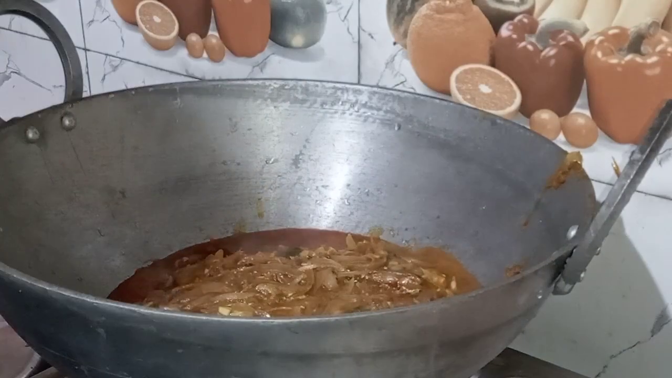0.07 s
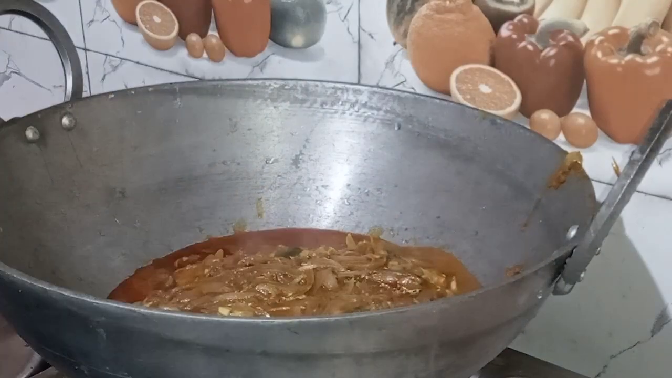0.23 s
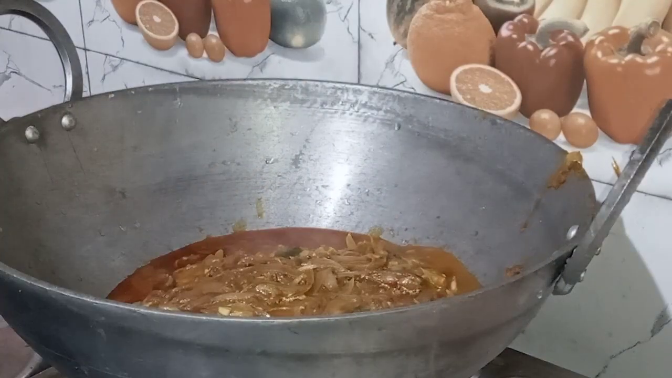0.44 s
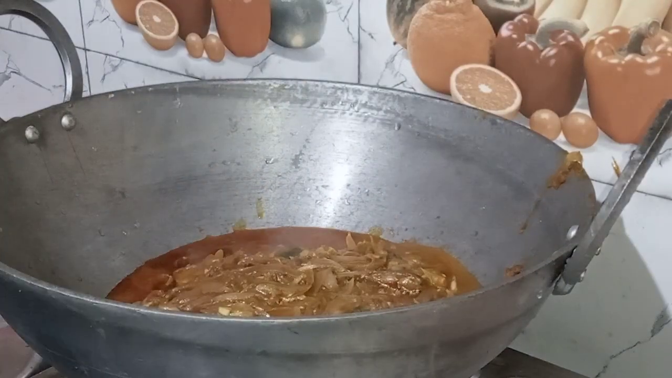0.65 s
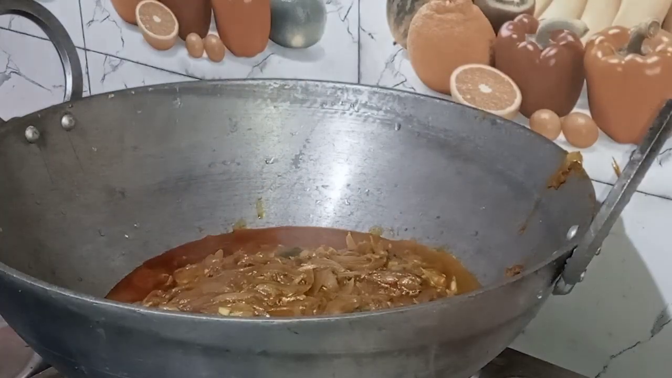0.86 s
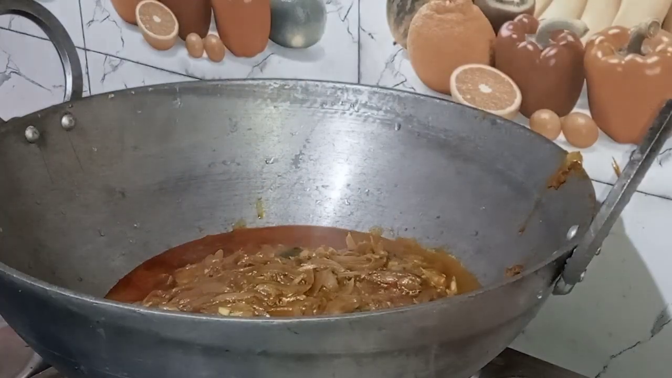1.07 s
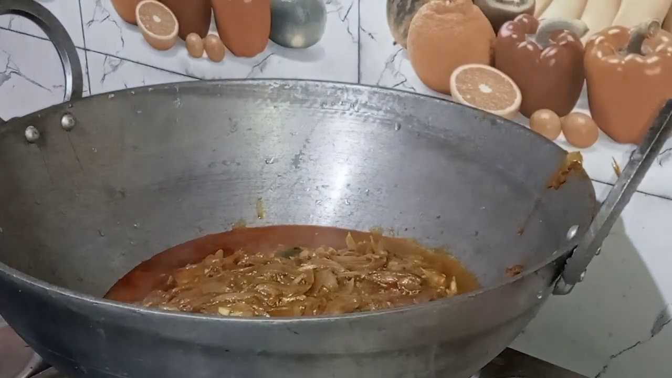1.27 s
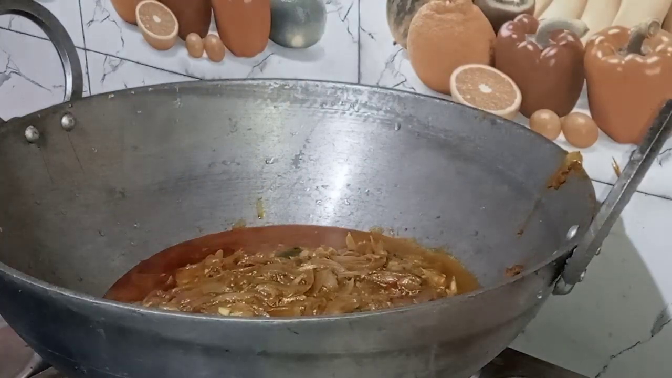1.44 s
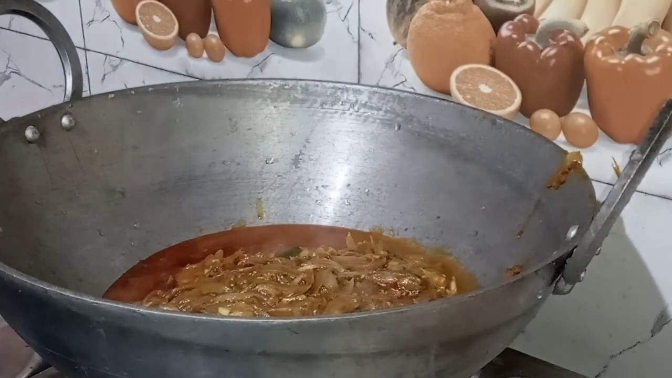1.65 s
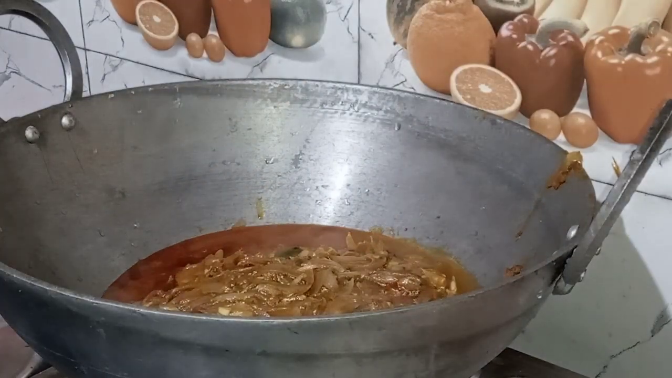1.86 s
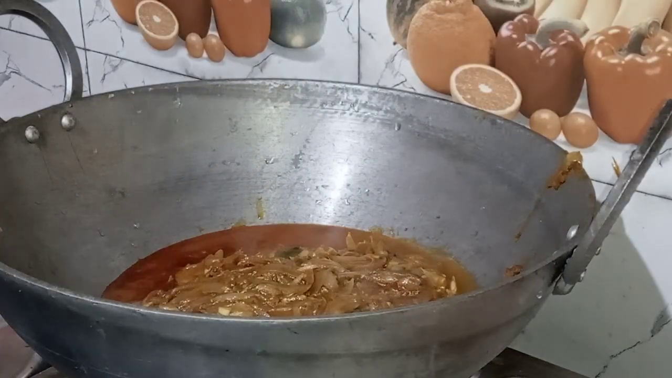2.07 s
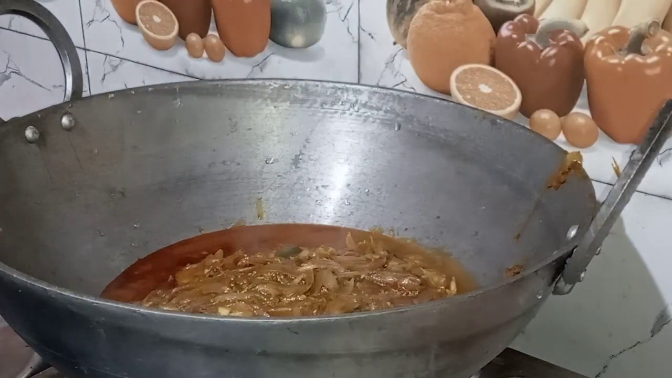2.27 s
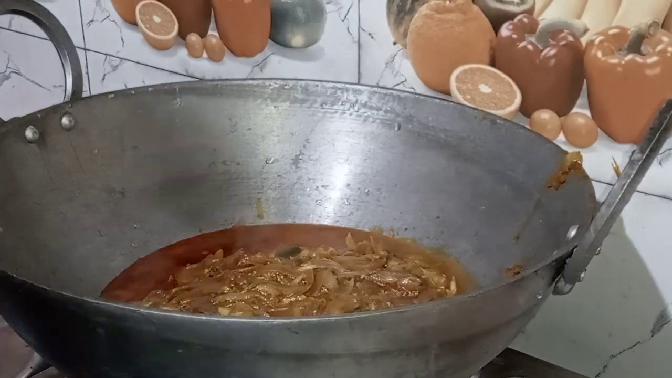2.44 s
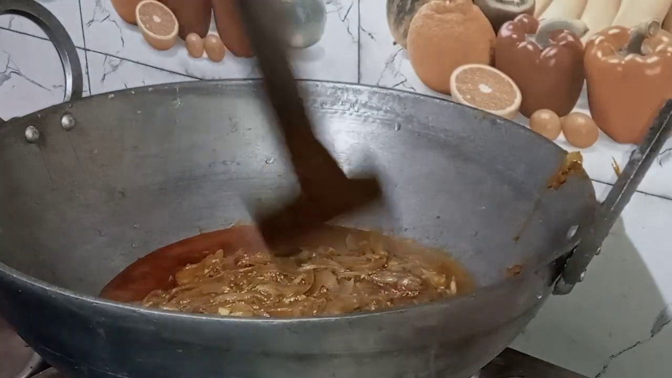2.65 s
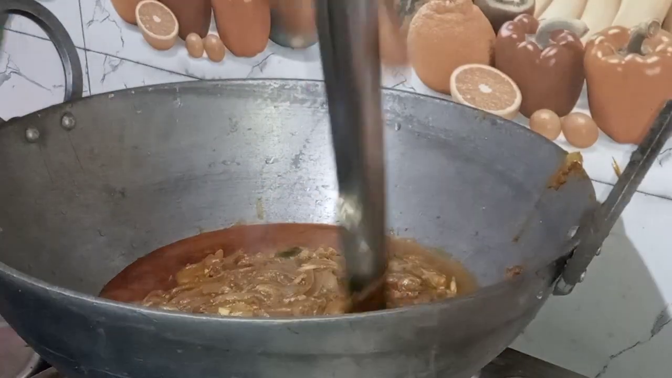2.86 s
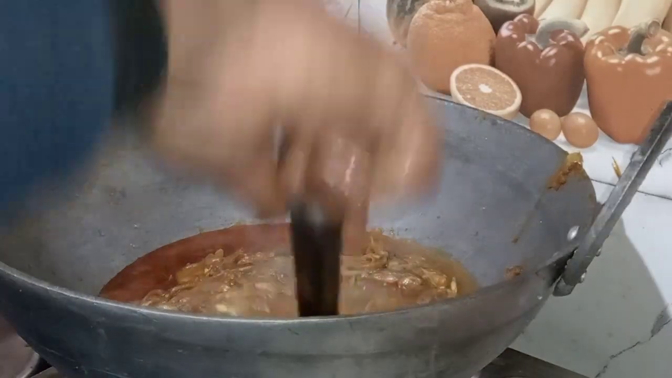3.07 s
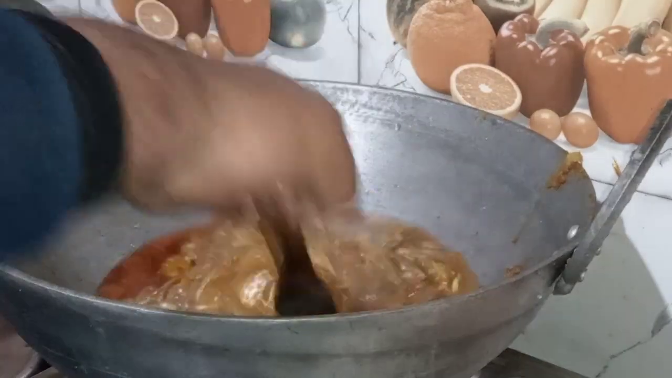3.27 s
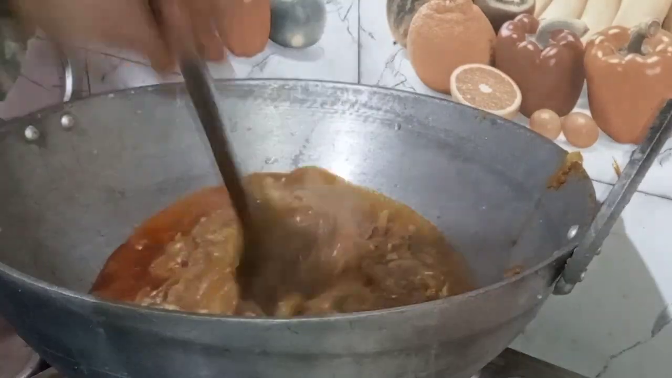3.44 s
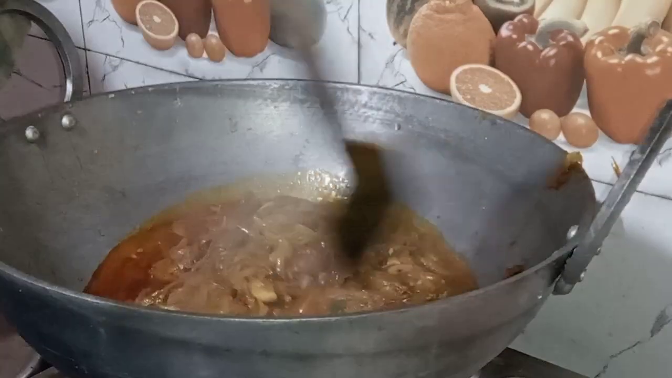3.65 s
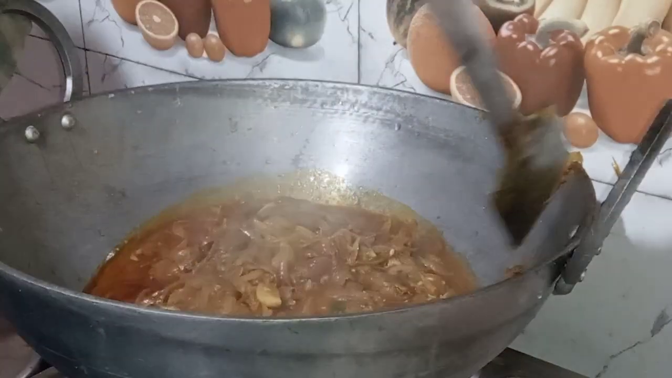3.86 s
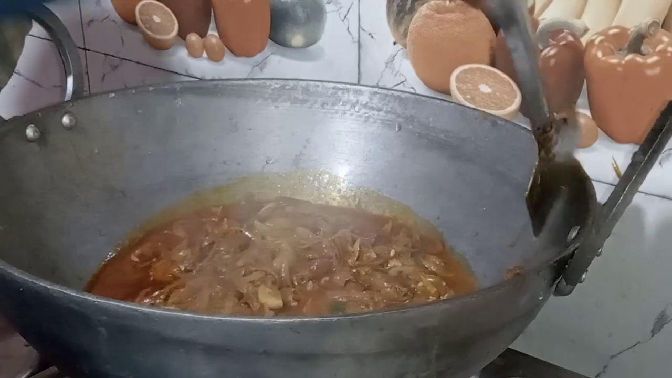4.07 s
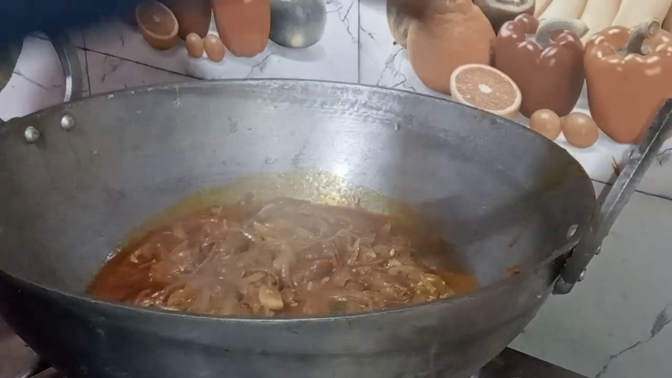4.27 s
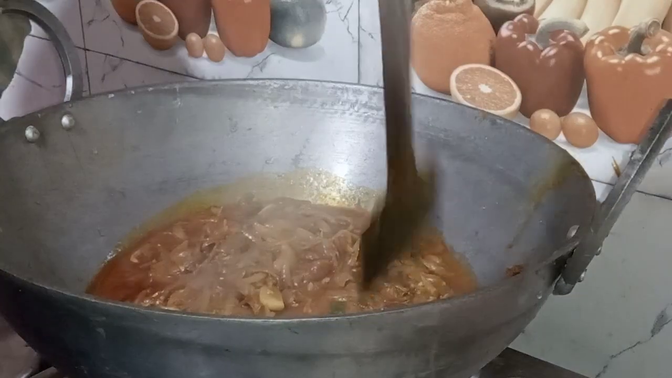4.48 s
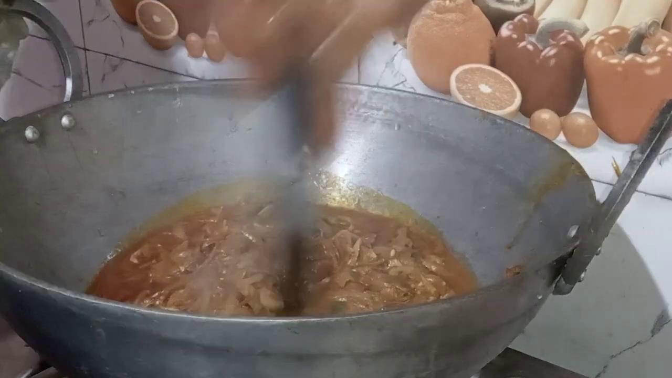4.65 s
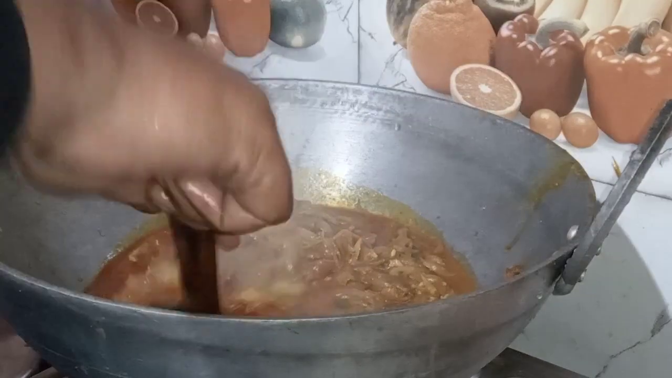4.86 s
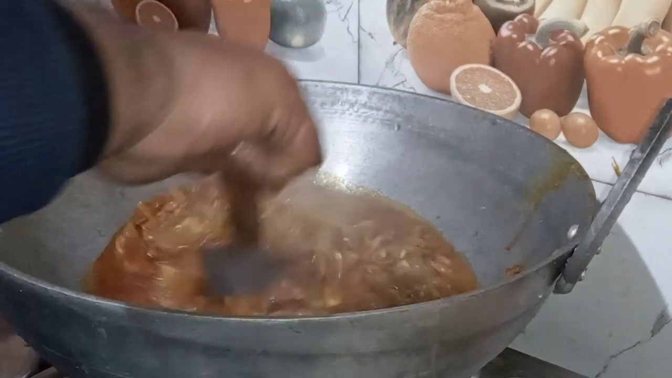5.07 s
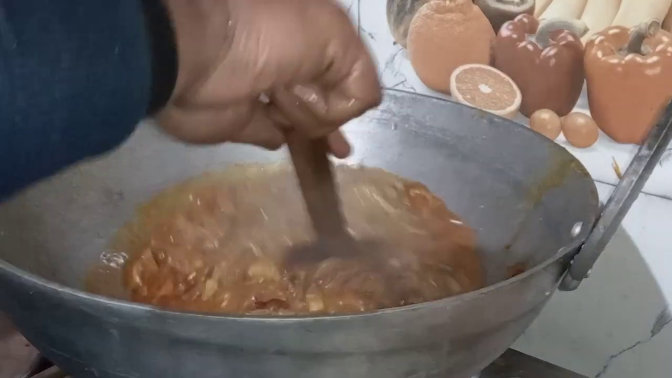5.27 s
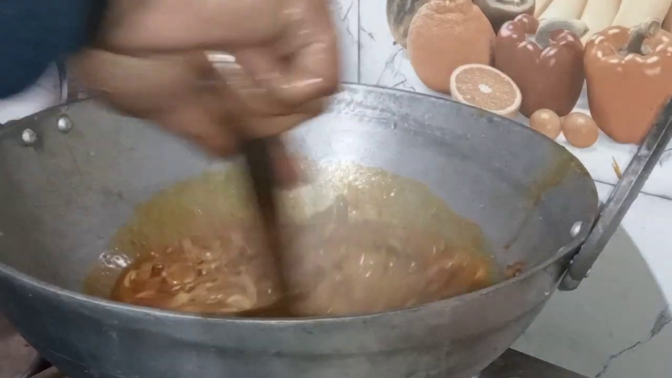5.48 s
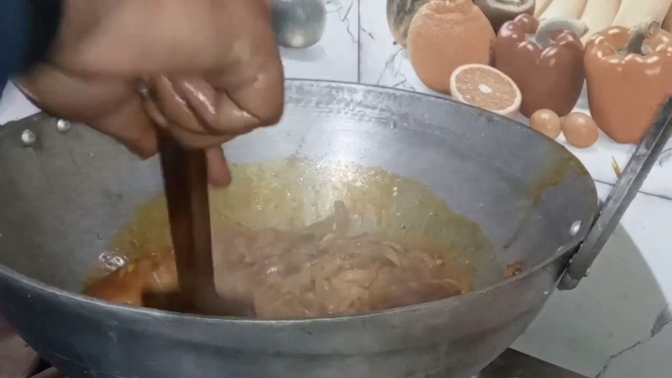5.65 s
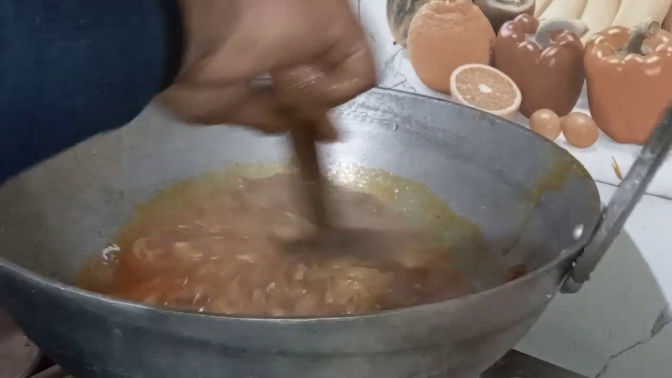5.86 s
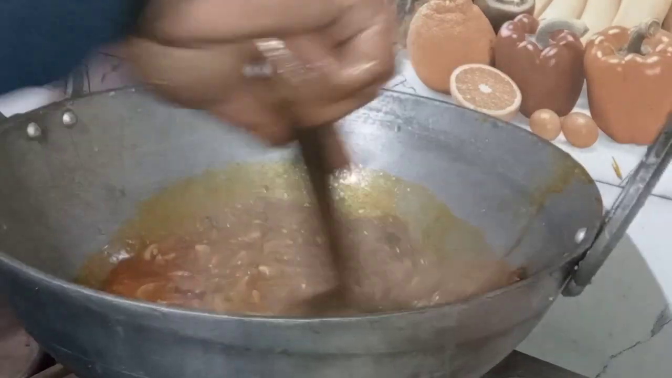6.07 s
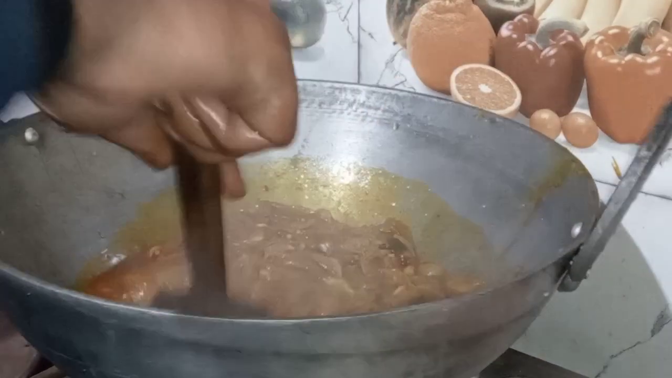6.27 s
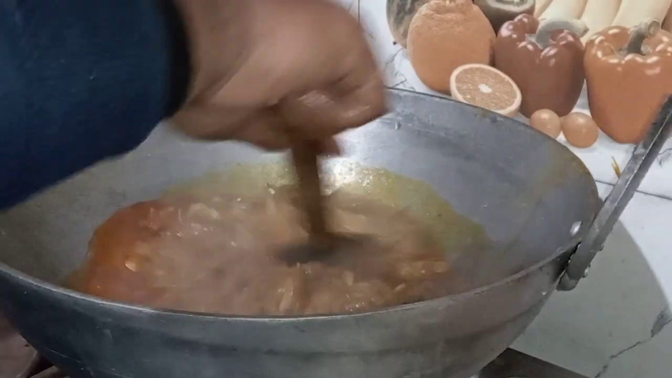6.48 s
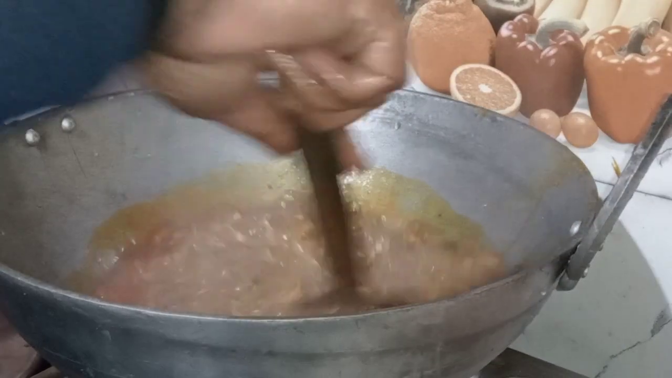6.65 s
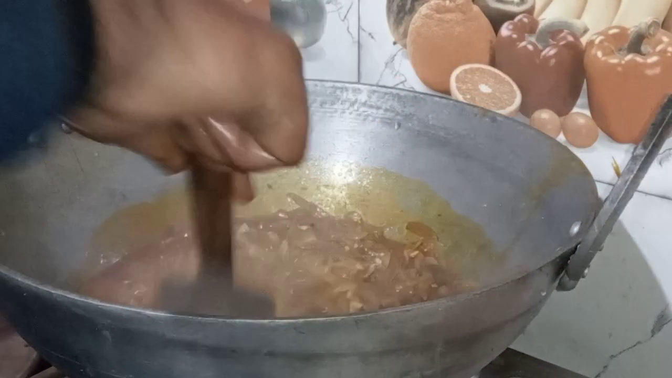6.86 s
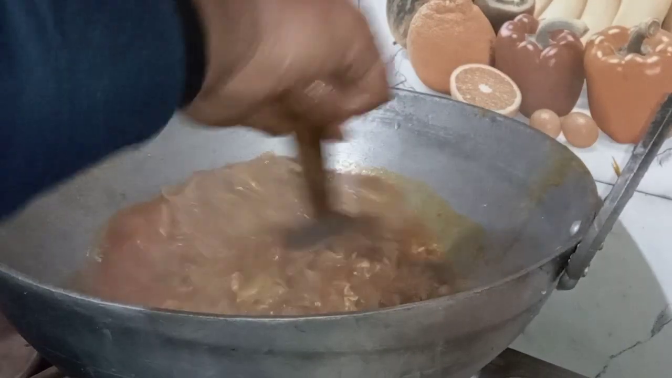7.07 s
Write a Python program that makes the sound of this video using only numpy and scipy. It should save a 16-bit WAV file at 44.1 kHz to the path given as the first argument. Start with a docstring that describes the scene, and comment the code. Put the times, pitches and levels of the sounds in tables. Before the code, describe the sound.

A quiet kitchen opens with a faint low rumble, a simmering murmur and soft cloth rustle. At about 1.4 seconds a metal pan is set down hard, bouncing briefly and ringing. At 2.2 seconds a ladle clinks brightly off a dish. At 2.9 seconds the steel ladle clanks into an iron pot and scrapes through thick curry until about 3.6 seconds. A quick ringing clatter of ladle on rim comes between 4.0 and 4.2 seconds. After another knock at 4.7 seconds, the stirring continues to the end at about 7 seconds: repeated gritty scrapes of steel on iron, mostly dropping in pitch, mixed with light, damped taps. The curry sloshes and gurgles softly after each stroke. Everything is close to one small microphone, with slightly dulled highs and a little ring from hard walls.

```python
"""A steel ladle knocks and scrapes round an iron pot of thick curry, close by in a quiet kitchen.
Both ring when they meet; the curry damps them and sloshes after each stroke. Before that, a pan is set
down hard and the ladle clinks off a dish. Behind it all: cloth rustle, a low rumble, a simmering murmur
and a little ring from hard walls. One small microphone, with no top octave, feeds a noise suppressor."""
import sys
import numpy as np
from scipy import signal
from scipy.io import wavfile
from scipy.ndimage import uniform_filter1d

SR = 44100
rng = np.random.default_rng(int(sys.argv[2]) if len(sys.argv) > 2 else 0)


def wav_record(signal):
    """Record a signal, one row per channel, as 16-bit PCM in the file named by sys.argv[1]."""
    frames = np.transpose(np.atleast_2d(signal))
    bounded = np.clip(frames, -1, 1)
    # unit amplitude maps onto the largest positive 16-bit level
    quanta = np.round(bounded * 32767).astype(np.int16)
    wavfile.write(sys.argv[1], SR, quanta)


N = 313992

# Clear modes of each object: (frequency [Hz], level [dB], t60 [s])
POT_MODES = [(461, -8.5, 0.15), (959, -17, 0.35), (1443, -12, 0.22), (1896, -6, 0.26), (2350, -4, 0.3),
             (2894, -2.5, 0.25), (3820, -5.5, 0.047), (4120, -12.5, 0.13), (4700, -14.5, 0.74),
             (5900, -10.5, 0.73), (7079, -2.5, 0.11)]
LADLE_MODES = [(1055, -11, 0.2), (1298, -10, 0.25), (3090, -10.5, 0.5), (3650, -2, 0.15), (4145, -3, 0.3),
               (5017, -5, 0.11), (5313, -6, 0.3), (6170, -10, 0.2)]
PAN_MODES = [(119, -13.5, 0.7), (264, -12.5, 1), (423, -6, 0.5), (549, -3, 0.7), (628, 5, 0.12),
             (660, -4, 0.8), (779, -6.5, 0.98), (952, -9, 0.4), (3144, -17, 0.5), (3553, -7.5, 0.65),
             (4124, -11, 0.55), (4926, -21, 0.45), (5426, -17.5, 0.27), (6487, -15, 0.35), (7424, -27, 0.3)]
DISH_MODES = [(2033, 1, 0.72), (2248, 7.5, 0.39), (2780, -13.5, 0.25), (4300, -3, 0.19), (4780, -8, 0.45),
              (5770, -6.5, 0.29), (6420, -9.5, 0.34)]
FAINT_VESSEL_MODES = [(678, -53, 0.96), (320, -49.5, 0.28), (1430, -60.5, 0.56)]
# The crowd of weak modes between the clear ones: (frequency [Hz], level [dB per Hz])
POT_CROWD_TONE = [(60, -49), (170, -14), (1200, -3), (2500, 0.5), (5000, 5), (7500, -3)]
PAN_CROWD_TONE = [(60, -32), (150, -8), (680, 4), (1500, -23), (3500, -18.5), (8000, -45.5)]
DISH_CROWD_TONE = [(60, -43), (170, -15), (1000, -11), (2300, -5.5), (7000, -18)]
# Base ring time of the crowds and the walls: (frequency [Hz], t60 [s])
RING_TIMES = [(100, 0.94), (600, 1), (2000, 0.68), (8000, 0.52)]
# Ladle on pot: (time [s], level [dB], hardness [dB per octave], ladle over pot [dB], share of free t60)
LADLE_KNOCKS = [(2.8672, -20, 0.5, 20, 0.37), (2.8734, -15.5, 5.5, 1, 0.8), (3.4929, -39.5, -3.5, 8, 0.37),
                (4.0506, -15, -1, 8, 0.8), (4.0775, -21, -1.5, 6.5, 0.99), (4.154, -24, -0.5, -1.5, 0.47),
                (4.1775, -18, -0.5, -23.5, 0.47), (4.191, -23.5, -1, -23.5, 0.94), (4.206, -33, -3, -21, 1),
                (4.6741, -22.5, 0.5, 16, 0.22), (5.5417, -45, 9, -3.5, 0.57), (5.659, -40, -5, -10, 0.36),
                (5.9147, -45, -1, -10.5, 0.22), (5.981, -46, -7, -13, 0.24), (6.2713, -35, 0.5, -22, 0.42),
                (6.5189, -34.5, -2.5, -14, 0.29), (6.7998, -33.5, 9, -10, 0.13)]
# Ladle dragged over iron: (start [s], length [s], landing time [s], first pressure [dB],
# last pressure [dB], grit above 3.5 kHz [dB], first pitch of the free iron [Hz], last pitch [Hz])
LADLE_STROKES = [(2.992, 0.26, 0.084, -43, -43.5, -3, 2220, 730),
                 (3.299, 0.29, 0.18, -48, -61.5, -5, 660, 510),
                 (4.71, 0.25, 0.027, -43.5, -43, -5, 2160, 796),
                 (5.039, 0.18, 0.28, -47.5, -45, -11, 642, 1194),
                 (5.286, 0.014, 0.035, -52.5, -49, 0, 1490, 1680),
                 (5.554, 0.045, 0.0089, -59, -57, 4, 1470, 1330),
                 (5.669, 0.095, 0.033, -47.5, -38.5, -10.5, 1530, 1350),
                 (5.781, 0.27, 0.019, -46, -68.5, -6.5, 900, 685),
                 (6.275, 0.19, 0.019, -39.5, -44.5, -9, 2150, 852),
                 (6.542, 0.013, 0.01, -43, -57, 4.5, 1490, 1510),
                 (6.875, 0.19, 0.045, -43.5, -36, -4, 1570, 1240)]
# Hits and bounces: (time [s], level [dB])
PAN_HITS = [(1.3572, -22), (1.3615, -12.5), (1.409, -26.5), (1.464, -35)]
DISH_HITS = [(2.1854, -14), (2.2294, -33), (2.3444, -39.5)]
# Cloth and hands moving: (time [s], level [dB], fade [s])
CLOTH_MOVES = [(0.531, -60.5, 0.21), (0.842, -57, 0.13), (2.37, -57.5, 0.17), (3.831, -52, 0.063)]
# Room tone: (time [s], rumble [dB], simmer [dB], hiss [dB])
ROOM_LEVELS = [(0, -70.5, -64.5, -65.5), (0.698, -65, -64, -69), (1.101, -58, -61.5, -68),
               (2.3, -62, -57, -64), (3.699, -61, -62.5, -62), (3.876, -63, -58.5, -60),
               (4.599, -68.5, -61.5, -68), (5.45, -74, -58.5, -68), (6.128, -60.5, -55.5, -67),
               (6.75, -58, -60.5, -72.5)]
# Edges of the rumble, simmer and hiss bands: (frequency [Hz])
ROOM_EDGES_HZ = [0, 200, 900, SR]
# Spectra of the noisy sources: (frequency [Hz], level [dB per Hz])
SCRAPE_TONE = [(120, -21), (260, -7), (600, -9), (1250, -9), (2100, -13), (2900, -9), (3900, -11),
               (6500, -14.5)]
SLOSH_TONE = [(150, -9.5), (270, -0.5), (550, -5), (900, 2.5), (1500, -28)]
CLOTH_TONE = [(450, -15), (1500, -9.5), (2500, -8.5), (6000, -10)]
ROOM_TONE = [(20, -38.5), (60, -14), (120, -0.5), (195, -17), (290, -17.5), (560, -29.5), (1000, -29.5),
             (1400, -25.5), (2500, -37), (5000, -35.5)]


def knocks():
    """Ladle and pot both ring; curry damps them, a hard edge brightens them."""
    out = np.zeros(N)
    for start, db, hardness_db, ladle_db, share in LADLE_KNOCKS:
        pot = ring(POT_MODES, hardness_db, share)
        ladle = amp(ladle_db) * ring(LADLE_MODES, hardness_db, share)
        # a free rim rings clearer
        dense = amp(5 - 11 * share) * crowd(POT_CROWD_TONE, hardness_db, .75 * share)
        add(out, start, blow(pot + ladle, dense, db))
    return out


def scrapes(slips_per_s=7000, grit_hz=3500):
    """Dense uneven slips of steel on iron excite the damped pot and ladle."""
    sizes = amp(0.76 * np.minimum(rng.exponential(1, N), 4))
    slips = sizes * rng.choice([-1, 1], N) * (rng.random(N) < slips_per_s / SR)
    modes = [(hz, 0, t60) for hz, _, t60 in POT_MODES + LADLE_MODES]
    damped = ring(modes, hardness_db=-1.5, share=0.077)[:SR // 4]
    friction = unit_rms(slips) + amp(-6.5) * unit_rms(signal.fftconvolve(slips, damped)[:N])

    def stroke_db(hz, t):
        treble, power = 1 / (1 + (grit_hz / (hz + 1)) ** 6), 1e-20
        for start, length, land, first_db, last_db, grit_db, first_hz, last_hz in LADLE_STROKES:
            # the iron above the curry drops in pitch as the ladle sinks
            free_hz = np.exp(np.interp(t, [start, start + length], np.log([first_hz, last_hz])))
            octaves = np.log2((hz + 1) / free_hz)
            resonance_db = 9 * np.exp(-(octaves / .33) ** 2)
            press_db = pressure(t, start, length, land, first_db, last_db)
            power = power + amp(press_db + (grit_db + 4.5) * treble + resonance_db) ** 2
        return curve(SCRAPE_TONE, hz) + 10 * np.log10(power) + 3 * blotches(hz, t, wide=2, long=14)
    return amp(13.5) * shaped(friction, stroke_db, size=512)


def pressure(t, start, length, land, first_db, last_db, climb_db=20, lift_db_per_s=293.5):
    """Level of one stroke in dB: the ladle lands, drifts from first to last, lifts off."""
    held = np.interp(t, [start, start + length], [first_db, last_db])
    landing = climb_db * np.maximum(start - t, 0) / max(land, .004)
    lifting = lift_db_per_s * np.maximum(t - start - length, 0)
    return held - landing - lifting


def slosh(lag_s=0.12):
    """The curry heaves in lumps and gurgles after the ladle, slow to build and slow to settle."""
    t, pole = np.arange(N) / SR, np.exp(-1 / (lag_s * SR))
    push = sum(amp(pressure(t, *stroke[:5])) for stroke in LADLE_STROKES)
    heave = signal.lfilter([1 - pole], [1, -pole], push)
    wet = rng.standard_normal(N) + amp(2.5) * gurgles()
    lumpy_db = lambda hz, t: curve(SLOSH_TONE, hz) + 3.5 * blotches(hz, t, wide=2, long=4)
    return amp(-11.5) * heave * unit_rms(shaped(wet, lumpy_db, size=1024))


def gurgles(pitches=24, bursts_per_s=5):
    """Pockets of air burst in the stirred curry: short tones that glide up as they die."""
    out, t = 0, np.arange(SR // 10) / SR
    for hz in np.geomspace(250, 1600, pitches):
        glide = np.sin(2 * np.pi * hz * t * (1 + 1.236 * t))
        bubble = glide * np.exp(-t * hz / 7.9) * (1 - np.exp(-t * hz))
        bursts = amp(3.8 * np.minimum(rng.exponential(1, N), 2)) * (rng.random(N) < bursts_per_s / SR)
        out = out + signal.oaconvolve(bursts, bubble)[:N]
    return unit_rms(out)


def struck(hits, modes, tone, crowd_db, share, crack):
    """The pan or the dish rings afresh at each hit and bounce."""
    out = np.zeros(N)
    for start, db in hits:
        add(out, start, blow(ring(modes), amp(crowd_db) * crowd(tone, share=share), db, crack))
    return out


def blow(clear, dense, db, crack=0.69, contact_s=0.002, crest_db=17):
    """A brief contact cracks; then clear and dense modes ring free."""
    t = np.arange(SR) / SR
    ringing = clear / np.sqrt(np.mean(clear[:SR // 20] ** 2)) + dense
    envelope = (1 - np.exp(-t / contact_s)) * (1 + crack * np.exp(-t / 0.026))
    return amp(db - crest_db) * ringing * envelope


def ring(modes, hardness_db=0., share=0.98):
    """Dying sines; swarms of close neighbours make each one flutter, and treble cannot ring long."""
    hz, db, t60 = np.transpose(modes)[:, :, None]
    t, phase = np.arange(SR) / SR, rng.random((len(modes), 1))
    real, imag = uniform_filter1d(rng.standard_normal((2, len(modes), SR // 20)), 14) * np.sqrt(14 / 2)
    flutter = 1 + 1.2 * hz / (hz + 2800) * np.repeat(real + 1j * imag, 20, axis=1)
    damped_t60 = np.clip(t60 * share, .02, 2600 / hz)
    fall = amp(db + hardness_db * np.log2(hz / 2000) - 60 * t / damped_t60)
    return (fall * (flutter * np.exp(2j * np.pi * (hz * t + phase))).imag).sum(0)


def crowd(tone, hardness_db=0., share=1.):
    """Countless weak modes: noise whose bands die at their own speed."""
    def fall_db(hz, t):
        t60 = np.clip(share * curve(RING_TIMES, hz), .02, 2)
        return curve(tone, hz) + hardness_db * np.log2((hz + 50) / 2000) - 60 * t / t60
    dense = shaped(rng.standard_normal(SR), fall_db, size=512)
    return dense / np.sqrt(np.mean(dense[:SR // 20] ** 2))


def rustle(rise_share=0.18):
    """Soft friction of cloth and hands: quick to swell, slower to fade."""
    t, swell = np.arange(N) / SR, 0
    for peak_s, db, fade_s in CLOTH_MOVES:
        width_s = np.where(t < peak_s, rise_share * fade_s, fade_s)
        swell = swell + amp(db) * np.exp(-((t - peak_s) / width_s) ** 2)
    cloth_db = lambda hz, t: curve(CLOTH_TONE, hz) + 3.5 * blotches(hz, t)
    return swell * unit_rms(shaped(rng.standard_normal(N), cloth_db))


def walls(x):
    """Sparse echoes off hard walls, treble dying first."""
    taps = rng.choice([-1., 1.], SR // 2) * (rng.random(SR // 2) < .05)
    taps[:200] = 0  # the direct sound reaches the microphone first
    tail = shaped(taps, lambda hz, t: -60 * t / np.clip(0.63 * curve(RING_TIMES, hz), .05, 2))
    return signal.fftconvolve(x, tail / np.linalg.norm(tail))[:N]


def room_tone(drone_hz=121):
    """Rumble and simmer heave together under a thin hiss, with an unsteady low drone."""
    t, out = np.arange(N) / SR, 0
    times, *levels = np.transpose(ROOM_LEVELS)
    rumble_db, simmer_db, hiss_db = (np.interp(t, times, db) for db in levels)
    slow = signal.butter(2, 6, fs=SR, output="sos")
    surge_db = 2.5 * unit_rms(signal.sosfilt(slow, rng.standard_normal(N)))
    bands_db = rumble_db + surge_db, simmer_db + surge_db, hiss_db
    for low, high, db, lumps_db in zip(ROOM_EDGES_HZ, ROOM_EDGES_HZ[1:], bands_db, (5, 4.5, 4)):
        def band_db(hz, t):
            lumpy_db = curve(ROOM_TONE, hz) + lumps_db * blotches(hz, t, wide=3, long=24)
            return np.where((hz >= low) & (hz < high), lumpy_db, -200)
        out = out + amp(db) * unit_rms(shaped(rng.standard_normal(N), band_db, size=2048))
    waver = unit_rms(uniform_filter1d(rng.standard_normal(N), SR // 10))
    return out + amp(rumble_db - 14.5) * np.sin(2 * np.pi * drone_hz * t) * waver


def faint_vessel():
    """A vessel struck earlier rings out in the first second."""
    out = np.zeros(N)
    add(out, 0, ring(FAINT_VESSEL_MODES) + amp(-59.5) * crowd(PAN_CROWD_TONE, hardness_db=4.9))
    return out


def hum(hz=830, start_s=0.3, stop_s=0.54, fade_db_per_s=22.5):
    """A thin, brief hum in the background."""
    t = np.arange(N) / SR
    gate = np.clip(np.minimum(t - start_s, stop_s - t) / 0.067, 0, 1)
    return gate * amp(-59.5 - fade_db_per_s * (t - start_s)) * np.sin(2 * np.pi * hz * t)


def suppressor(x, depth_db=-9, reach_db=7):
    """A noise suppressor lowers every bin that stays near its own quietest level."""
    spectrum = signal.stft(x, SR, nperseg=1024, noverlap=768)[2]
    level_db = 10 * np.log10(abs(uniform_filter1d(abs(spectrum) ** 2, size=9, axis=1)) + 1e-20)
    over_db = level_db - np.percentile(level_db, 15, axis=1, keepdims=True)
    gain = amp(depth_db * np.clip(0.5 - over_db / reach_db, 0, 1))
    return signal.istft(spectrum * gain, SR, nperseg=1024, noverlap=768)[1][:N]


def amp(db):
    return 10 ** (np.asarray(db, float) / 20)


def unit_rms(x):
    return x / np.sqrt(np.mean(x ** 2) + 1e-20)


def curve(points, hz):
    points_hz, values = np.transpose(points)
    return np.interp(np.log(hz + 1), np.log(points_hz + 1), values)


def add(mix, start_s, sound):
    part = mix[round(start_s * SR):][:len(sound)]
    part += sound[:len(part)]


def shaped(x, field_db, size=256):
    """Multiplies the short-time spectrum by a dB field, a function of (frequency [Hz], time [s])."""
    frames = dict(fs=SR, nperseg=size, noverlap=size * 3 // 4)
    hz, t, spectrum = signal.stft(x, **frames)
    return signal.istft(spectrum * amp(field_db(hz[:, None], t)), **frames)[1][:len(x)]


def blotches(hz, t, wide=4, long=12):
    """Random patches of spread 1, `wide` bins by `long` frames."""
    field = rng.standard_normal((len(t), len(hz))).T
    return unit_rms(uniform_filter1d(uniform_filter1d(field, wide, 0), long, 1))


def scene():
    """Cookware close by, the walls 10 dB under it, the quiet kitchen behind; mono."""
    pan = struck(PAN_HITS, PAN_MODES, PAN_CROWD_TONE, crowd_db=2, share=1, crack=3.8)
    dish = struck(DISH_HITS, DISH_MODES, DISH_CROWD_TONE, crowd_db=-7.5, share=0.57, crack=1)
    close = pan + dish + knocks() + scrapes() + slosh()
    return (close + amp(-10) * walls(close) + rustle() + room_tone() + faint_vessel() + hum())[None]


def record(dry, bass_hz=65, treble_hz=7550, limit_hz=8500):
    """The small microphone loses deep bass and top; then suppressor, band limit and converter noise."""
    mic = signal.sosfilt(signal.butter(3, bass_hz, "high", fs=SR, output="sos"), dry)
    mic = signal.sosfilt(signal.butter(20, treble_hz, fs=SR, output="sos"), mic)
    band_limit = signal.firwin(601, limit_hz, window=("kaiser", 9), fs=SR)
    limited = signal.oaconvolve(suppressor(mic[0])[None], band_limit[None], "same")
    return limited + amp(-101) * rng.standard_normal(dry.shape)


dry = scene()
out = record(dry)
wav_record(out)
```